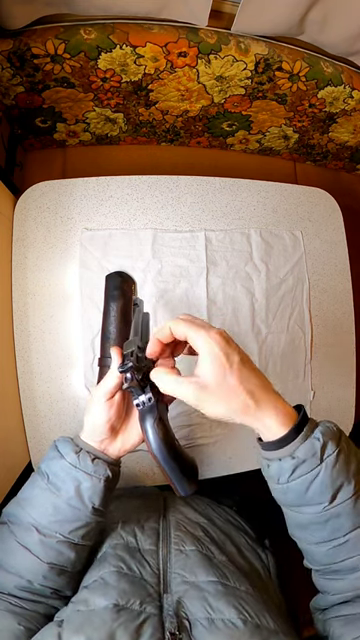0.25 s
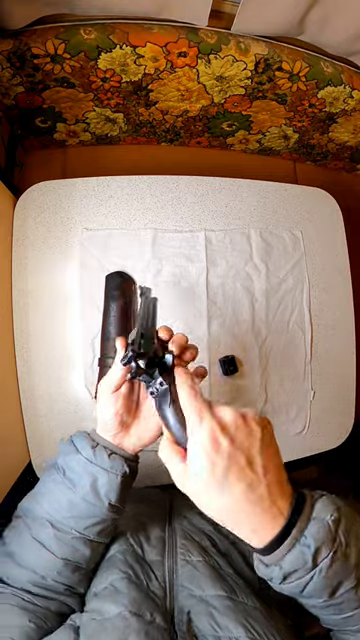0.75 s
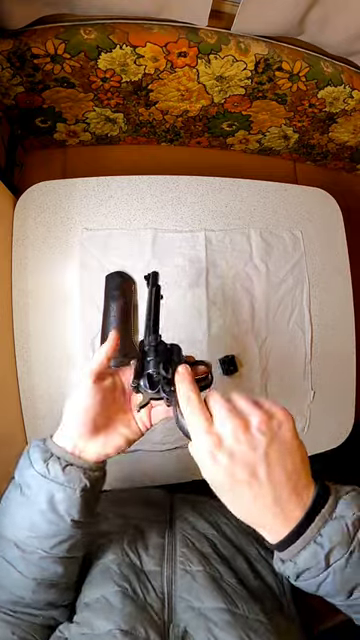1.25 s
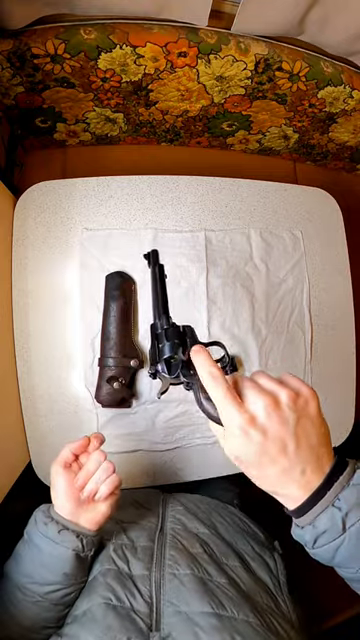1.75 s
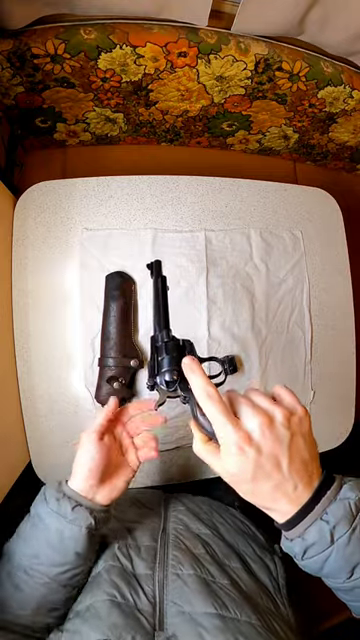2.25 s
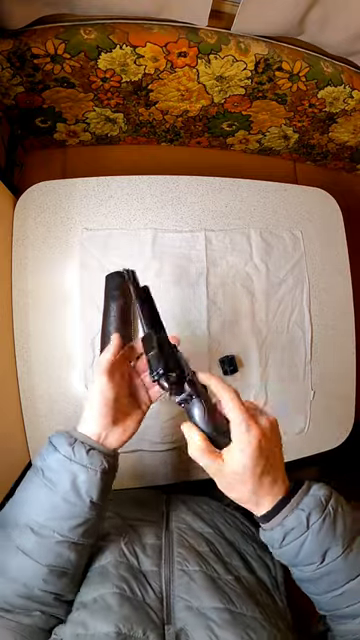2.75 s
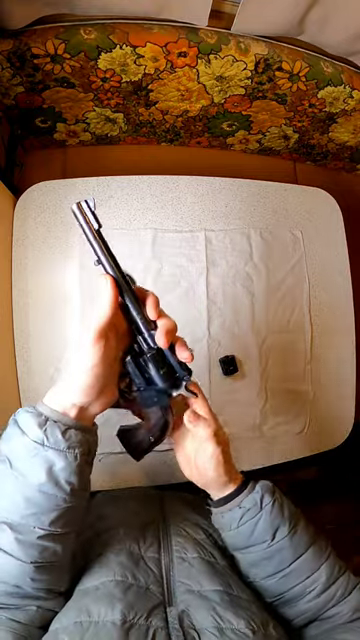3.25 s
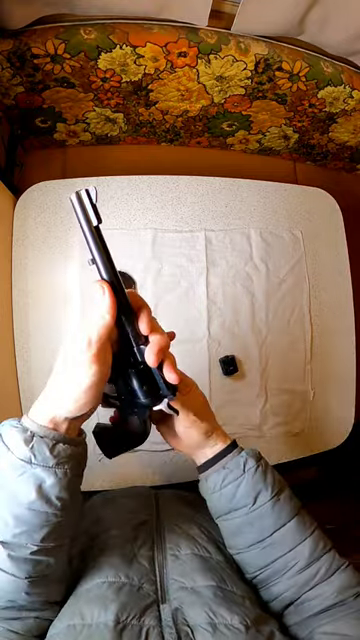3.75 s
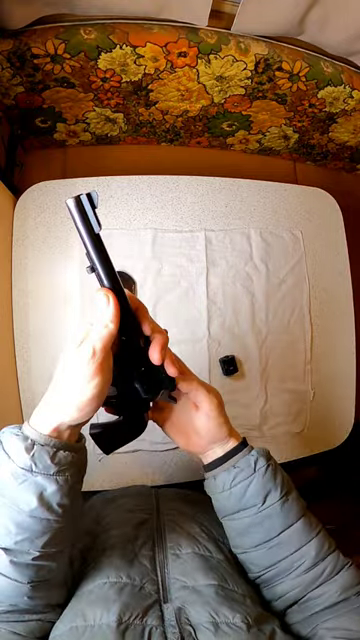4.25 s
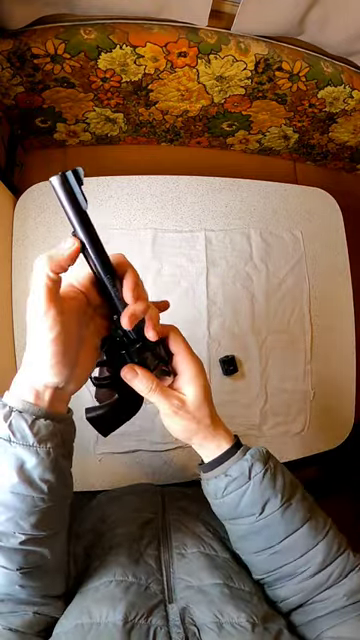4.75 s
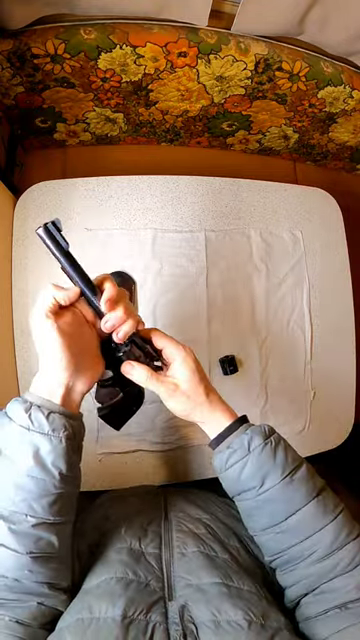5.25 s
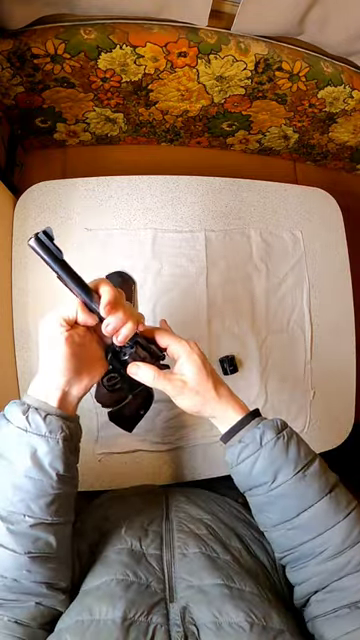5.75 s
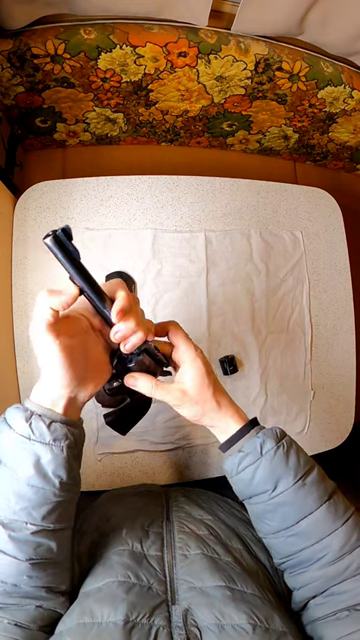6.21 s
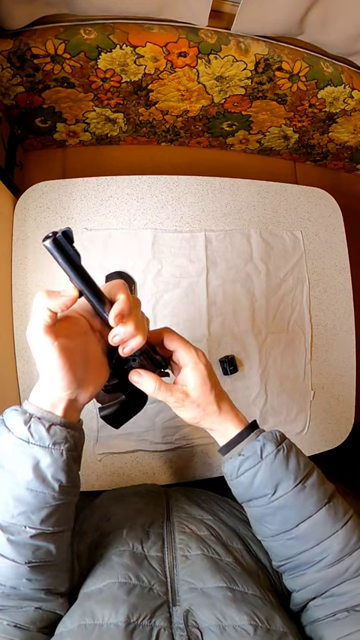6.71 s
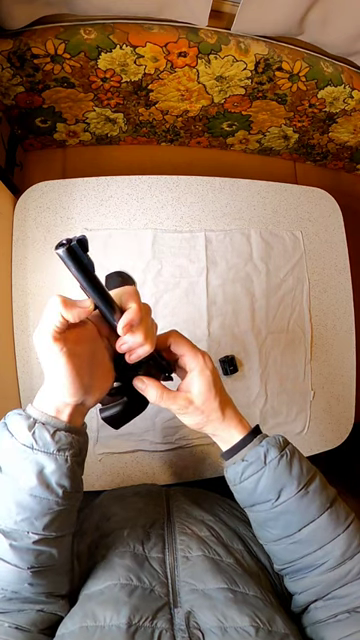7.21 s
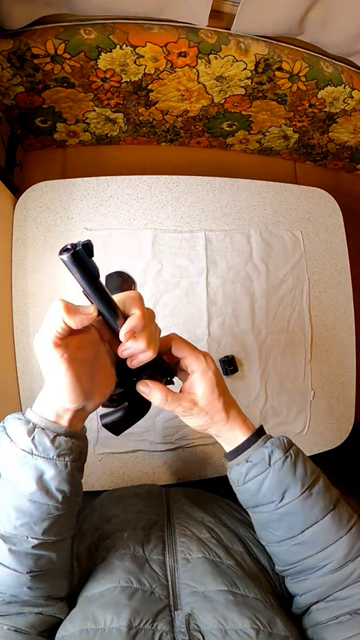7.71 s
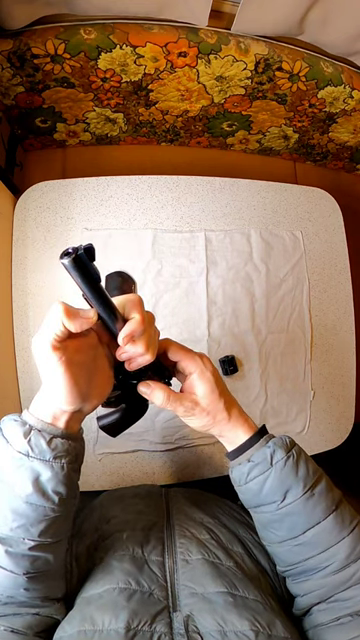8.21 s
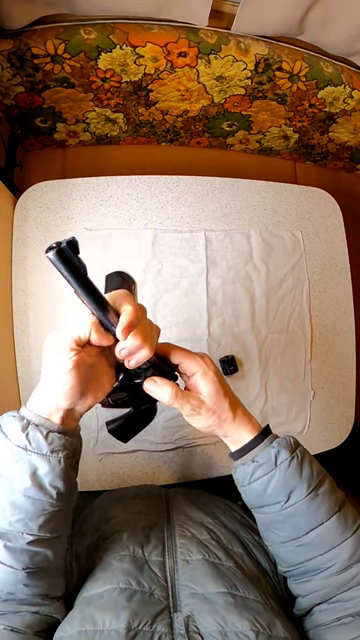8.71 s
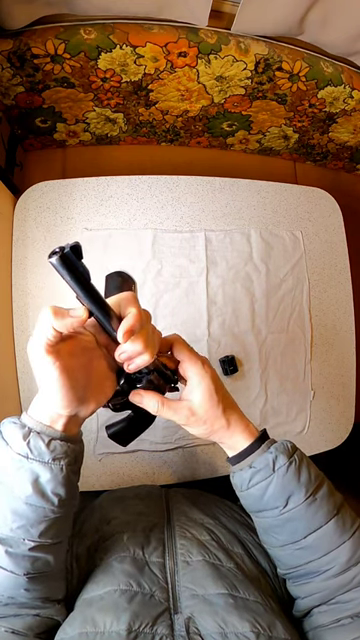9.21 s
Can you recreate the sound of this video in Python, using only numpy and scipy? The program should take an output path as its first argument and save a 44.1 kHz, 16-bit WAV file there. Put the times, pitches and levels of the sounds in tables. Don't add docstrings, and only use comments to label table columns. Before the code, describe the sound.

A close, dry stereo perspective in a small furnished room, with soft air, a faint appliance hum and muffled traffic. Nylon sleeves swish during the first second. From 1.36 to 1.68 s a revolver cylinder spins: about eighteen bright ratchet clicks speed up, then slow, with loose knocks between. A loud hard gate snap lands at 2.05 s and a softer shutting click at 2.5. Sleeves rub most from 2 to 5 s, with a tiny squeak near 2.3, while a low engine passes outside, strongest around 3 to 4.5. A thin rod clicks at 4.1 and faintly at 5.0. Bright brass knocks strike at 5.76, a cylinder stop clicks at 6.65, and a small pawl at 6.9. An engine idles faintly from 7.5 to 8.7. Action clicks come at 8.4 to 8.5, a cartridge bounces quickly at 8.85, dull table thumps follow until 9.06, and a latch closes at 9.46.

```python
import sys
import numpy as np
from scipy import signal
from scipy.fft import rfft, irfft, next_fast_len
from scipy.io import wavfile
from scipy.ndimage import uniform_filter1d, map_coordinates

SR = 44100
rng = np.random.default_rng(int(sys.argv[2]) if len(sys.argv) > 2 else 0)


def makeup_ratio(level_db):
    decades = np.asarray(level_db, float) / 20
    return 10 ** decades


def generate_wav(sig):
    pcm = np.round(np.clip(np.atleast_2d(sig).T, -1, 1) * 32767).astype(np.int16)
    wavfile.write(sys.argv[1], SR, pcm)


N = 417627
SPAN = 8192

# centre_hz, width_hz, level_db
CYLINDER_MODES = [(800, 200, -13.5), (2250, 500, -7), (3430, 60, -8), (3800, 300, -4), (4120, 250, -6),
                  (4900, 350, -7), (6360, 190, 0), (7250, 200, -9), (7800, 300, -7), (9150, 400, -1),
                  (11200, 900, -6), (15000, 2000, -7)]
# centre_hz, width_hz, level_db
FIRST_TOOTH_MODES = [(2070, 250, -11), (3780, 230, -3), (4200, 200, -8), (5290, 220, -9), (6300, 200, 1),
                     (6890, 130, -4), (7950, 150, -5), (8820, 200, 4), (11000, 600, -5)]
# centre_hz, width_hz, level_db
LAST_TOOTH_MODES = [(2400, 250, -12), (3430, 80, -17), (3870, 150, -5), (4150, 150, -4), (4800, 150, -10),
                    (5640, 130, -5), (6320, 130, 0), (7540, 150, -10), (9060, 200, -2), (9850, 200, -8),
                    (11400, 900, -8)]
# centre_hz, width_hz, level_db
FRAME_MODES = [(720, 130, -3), (1550, 250, 5), (2510, 130, -3), (2965, 150, 6.5), (3650, 250, -0.5),
               (4480, 220, 4.5), (6400, 300, 1), (7126, 200, -1.5), (8740, 500, -1)]
# centre_hz, width_hz, level_db
SIDE_ON_MODES = [(970, 100, 0), (1680, 300, 6), (2370, 250, 2), (3210, 300, 3), (4960, 250, 2),
                 (5820, 400, 2), (6890, 360, 2)]


def unit(x):
    return x / np.sqrt(np.mean(x ** 2) + 1e-20)


def short_peak(x):
    return np.sqrt(uniform_filter1d(x ** 2, size=130).max())


def along(points, hz):
    f, v = np.transpose(points)
    return np.interp(np.log(hz + 1), np.log(f + 1), v)


def curves(rows):
    s, *cols = np.transpose(rows)
    return [np.interp(np.arange(N) / SR, s, c, left=-120, right=-120) for c in cols]


def wobble(rate):
    knots = rng.standard_normal(int(N * rate / SR) + 4)
    return map_coordinates(knots, [np.arange(N) * rate / SR])


def filtered(x, response):
    m = next_fast_len(N + SPAN)
    return irfft(rfft(x, m) * response(np.fft.rfftfreq(m, 1 / SR)), m)[..., :N]


def echo():
    # pitch_hz, likeness
    walls = [(300, 1), (2500, .85), (9000, 0.68)]
    # pitch_hz, t60_s
    decay = [(200, 0.33), (1300, 0.15), (3500, 0.099), (8000, 0.075), (12000, .08)]
    hz, t, z = signal.stft(rng.standard_normal((2, SPAN)), SR, nperseg=256)
    turn = np.arccos(np.clip(along(walls, hz), -1, 1))[:, None] / 2
    fade = makeup_ratio(-60 * t / along(decay, hz)[:, None])
    mid, side = z * fade * [np.cos(turn), np.sin(turn)]
    tail = signal.istft(np.array([mid + side, mid - side]), SR, nperseg=256)[1]
    delayed = np.pad(tail, ((0, 0), (200, 0)))[:, :SPAN]
    return delayed / np.linalg.norm(tail[0])


def add(out, s, sound, pan_db, room_db):
    wet = signal.fftconvolve(sound[None], echo(), axes=1)[:, :SPAN]
    lead = .35 * rng.standard_normal() * np.gradient(sound) * [[1], [-1]]
    both = (sound + lead) * makeup_ratio([[pan_db / 2], [-pan_db / 2]]) + makeup_ratio(room_db) * wet
    out[:, round(s * SR):][:, :SPAN] += both


def click(db, middle_db, hard_db, bright_db, dull_db, t60, modes, ring_db, scatter_db, chatter, blow, detune=0):
    t, f = np.arange(SPAN) / SR - .0009, np.fft.rfftfreq(SPAN, 1 / SR)
    grind = .5 * np.exp(-np.abs(t / chatter) ** 4)
    rattle = 0.43 * makeup_ratio(-60 * t / np.clip(t60, .002, .1))
    force = (t > 0) * (grind + rattle) * rng.standard_normal(SPAN)
    blow_and_rebound = np.searchsorted(t, [0, chatter * rng.uniform(.6, .9)])
    force[blow_and_rebound] += blow * np.array([-7.5, 3.5])
    force = rfft(force)
    evenness = np.sqrt(uniform_filter1d(np.abs(force) ** 2, size=44))
    ring = 0
    for centre, width, mode_db in modes:
        level_db = ring_db + mode_db + rng.normal(0, scatter_db)
        centre = centre * (1 + detune * rng.standard_normal())
        ring = ring + makeup_ratio(2 * level_db) / (1 + (2 * (f - centre) / width) ** 2)
    colour = makeup_ratio(along([(250, dull_db - 18.5), (1200, dull_db), (2400, -0.54), (3900, middle_db - 2.5),
                        (6400, hard_db - 2), (10000, bright_db - 1.0), (15000, bright_db - 12.5)], f))
    cepstrum = irfft(np.log(colour * np.sqrt(1 + ring) / evenness))
    cepstrum[1:SPAN // 2] *= 2
    cepstrum[SPAN // 2 + 1:] = 0
    sound = irfft(force * np.exp(rfft(cepstrum)))
    band = irfft(rfft(sound) * (f > 1800) * (f < 3100))
    return makeup_ratio(db - 7.0) * sound / short_peak(band)


def ratchet(out):
    # start_s, peak_db, middle_db, hard_db, bright_db
    teeth = [(1.3612, -13.5, 3.5, -1, -6), (1.3857, -11.5, 2, -1.5, -9.5), (1.4005, -11.5, 3, -3, -7.5),
             (1.4117, -9.5, 2.5, -5.5, -8), (1.4222, -11.5, 0.5, -2, -7), (1.4327, -10.5, -1, -2, -8.5),
             (1.4441, -12, 1.5, -1.5, -9), (1.4561, -11.5, 0.5, -1, -10), (1.4681, -12, 2, 0, -9.5),
             (1.4812, -12.5, 3.5, -3.5, -9.5), (1.4954, -12.5, 2.5, -1, -9.5), (1.51, -12.5, 1, -2, -8.5),
             (1.5259, -12.5, 1, -1.5, -8.5), (1.5439, -12, 0.5, -1.5, -9), (1.5638, -13, 1, -1.5, -7.5),
             (1.5883, -11.5, 2, -3, -7.5), (1.6207, -11, 3, 0, -6), (1.6736, -11.5, 6, 3.5, -6)]
    parts = [FIRST_TOOTH_MODES] + [CYLINDER_MODES] * (len(teeth) - 3) + [LAST_TOOTH_MODES] * 2
    for (s, db, *colour), part in zip(teeth, parts):
        detune = .012 * (part is CYLINDER_MODES)
        tooth = click(db, *colour, dull_db=-2, t60=.035, modes=part, ring_db=16, scatter_db=2.5,
                      chatter=.0028, blow=.45, detune=detune)
        add(out, s, makeup_ratio(db - 9.7) * tooth / short_peak(tooth), pan_db=-0.2, room_db=-11.0)


def loose_cylinder(out):
    # start_s, peak_db
    knocks = [(1.3635, -14.5), (1.372, -27.5), (1.407, -17.5), (1.477, -18.5), (1.4825, -12), (1.4875, -16),
              (1.553, -24), (1.571, -21), (1.5795, -22.5), (1.598, -26.5), (1.6233, -17.5), (1.676, -17)]
    parts = [FIRST_TOOTH_MODES] * 2 + [CYLINDER_MODES] * (len(knocks) - 4) + [LAST_TOOTH_MODES] * 2
    for (s, db), part in zip(knocks, parts):
        knock = click(db, middle_db=3, hard_db=-3, bright_db=-7, dull_db=-4, t60=.03, modes=part,
                      ring_db=14, scatter_db=2.5, chatter=.0029, blow=.28)
        add(out, s, makeup_ratio(db) * knock / np.abs(knock).max(), pan_db=0.5, room_db=-10.0)


def loading_gate(out):
    # start_s, peak_db, middle_db, hard_db, bright_db, dull_db
    snap = (2.0463, -8.5, -4, -1, -11.5, -8)
    # centre_hz, width_hz, level_db
    open_modes = [(2480, 500, 1), (3770, 200, -2), (4370, 150, 2), (4980, 310, 3), (5400, 200, 1),
                  (6300, 250, 6), (6870, 250, 3), (8130, 250, 0), (8900, 300, 2), (10900, 600, 3)]
    # start_s, peak_db, middle_db, hard_db, bright_db
    shutting = [
        (2.5237, -20, -8, -4, -10),
        (2.526, -24, -3.5, -1, -9),
    ]
    # centre_hz, width_hz, level_db
    shut_modes = [(745, 118, 8.5), (2100, 300, 6), (2880, 200, 3), (4550, 150, 1), (5510, 200, 4),
                  (6590, 200, 1), (6950, 200, 3), (8200, 300, 4), (8800, 180, 2), (10500, 500, -1)]
    sound = click(*snap[1:], t60=.013, modes=open_modes, ring_db=5, scatter_db=.6, chatter=.0023, blow=1)
    add(out, snap[0], sound, pan_db=0.6, room_db=-16.5)
    for s, *levels in shutting:
        sound = click(*levels, dull_db=-11.5, t60=.035, modes=shut_modes, ring_db=5, scatter_db=.6,
                      chatter=.0022, blow=.7)
        add(out, s, sound, pan_db=0.0, room_db=-12.5)


def ejector_rod(out):
    # start_s, peak_db, middle_db, hard_db, bright_db
    contacts = [
        (4.1049, -25, -5, 7, -6.5),
        (4.107, -35, -5, -5, -12),
        (5.0377, -36, -3, -12, -16),
    ]
    # centre_hz, width_hz, level_db
    modes = [(2510, 290, -6), (3893, 200, 0), (6600, 200, -13), (7080, 150, 3.5), (7400, 150, 4),
             (7930, 150, 3), (8860, 300, 4)]
    for s, *levels in contacts:
        sound = click(*levels, dull_db=-8, t60=.02, modes=modes, ring_db=7, scatter_db=.5,
                      chatter=.0015, blow=.68)
        add(out, s, sound, pan_db=-1.0, room_db=-10)


def cylinder_stop(out):
    # start_s, peak_db, middle_db, hard_db, bright_db
    contacts = [
        (6.6436, -25, 0, 3, -4),
        (6.647, -22, -1, -1, -8),
        (6.6576, -28.5, 0, -14, -30),
    ]
    # centre_hz, width_hz, level_db
    modes = [(1500, 200, -1), (2500, 170, 0), (3190, 260, 4), (3970, 180, 0), (4900, 250, -3),
             (5680, 150, 0), (6670, 220, 3), (7170, 150, 3), (9090, 150, 5), (11200, 400, 5)]
    for s, *levels in contacts:
        sound = click(*levels, dull_db=-11, t60=.04, modes=modes, ring_db=6, scatter_db=.9,
                      chatter=.0028, blow=.45)
        add(out, s, sound, pan_db=1.2, room_db=-13)


def action(out):
    # start_s, peak_db, middle_db, hard_db, bright_db
    contacts = [
        (8.4202, -34, -3, -7, -28),
        (8.4206, -34, -3, -9.5, -33),
        (8.4262, -30.5, -8, -3.5, -14),
        (8.4888, -19, -5, -2, -14.5),
        (8.4966, -27, -1, -14, -30),
        (8.5012, -24, 7, 2, -12),
        (8.509, -39, 3, 0, -17),
    ]
    # start_s, peak_db, middle_db, hard_db
    faint = [(2.027, -52, -4, -3), (2.0355, -42.5, -7, -5), (2.0385, -44.5, -6, -4), (5.747, -54, -1, -14),
             (5.752, -45, 0, -8), (2.043, -39, -3.5, 3), (4.087, -53, -3, 1), (5.6729, -61, 3.5, 8),
             (6.624, -46.5, -3.5, -21.5), (6.934, -52, 0, -14.5), (8.478, -56, 0, -8),
             (8.7311, -53.5, -1.5, -8)]
    for s, *levels in contacts:
        sound = click(*levels, dull_db=-5, t60=.037, modes=FRAME_MODES, ring_db=5, scatter_db=1.2,
                      chatter=.002186, blow=.5)
        add(out, s, sound, pan_db=2.0, room_db=-13)
    for s, db, middle_db, hard_db in faint:
        tick = click(db + 1.5, middle_db, hard_db, bright_db=hard_db - 20.5, dull_db=-14, t60=.01,
                     modes=FRAME_MODES, ring_db=.5, scatter_db=3, chatter=.0018, blow=.35)
        add(out, s, tick, pan_db=.4, room_db=-14.5)


def table_thump(scatter_db):
    # pitch_hz, level_db, t60_s
    modes = [(174.6, -1.5, 0.38), (225.6, 1.5, 0.15), (257.7, -2.5, 0.13), (390.4, -4, 0.13),
             (433.7, -4.5, 0.095), (652, -7, 0.15), (730, -10.5, 0.07), (981, -1.5, 0.095),
             (1130, -18, 0.31)]
    t, wood = np.arange(SPAN) / SR, 0
    for hz, db, t60 in modes:
        level = makeup_ratio(db + rng.normal(0, scatter_db) - 60 * t / t60)
        wood = wood + level * np.sin(2 * np.pi * hz * t)
    return wood * (1 - np.exp(-t / 0.0037))


def drops(out):
    # start_s, peak_db, hard_db, dull_db, thump_db
    falls = [
        ((-.5, -17), [(5.7573, -7.5, -10, -17.5, -20), (5.762, -6, -5.5, -18, -24.5), (5.7706, -19, -6.5, -7.5, -24), (8.8803, -24, -13, -9, -18.5)]),
        ((-4, -41), [(8.9295, -25, -24, -4, -22), (8.938, -29.5, -26, 2, -25), (9.0498, -15.5, -19, -7, -19.5), (9.058, -24.5, -17, -2, -11)]),
    ]
    # centre_hz, width_hz, level_db
    brass_modes = [(1183, 202, 1.5), (1900, 230, 7), (2450, 330, -11), (3230, 310, 6.5), (4240, 152, -10.5),
                   (6280, 400, 5.5), (7300, 850, -1)]
    for ((middle_db, bright_db), bounces), part in zip(falls, [brass_modes, SIDE_ON_MODES]):
        for s, db, hard_db, dull_db, thump_db in bounces:
            thump = makeup_ratio(db + thump_db - 4.0) * table_thump(scatter_db=0.93)
            brass = click(db - 6.5, middle_db, hard_db + 3.5, bright_db + 2.5, dull_db + 6.0, t60=.033,
                          modes=part, ring_db=4, scatter_db=1.2, chatter=.002, blow=.7)
            add(out, s, brass + thump, pan_db=0.0, room_db=-8.0)


def cartridge(out):
    # start_s, peak_db
    landings = [
        (8.8503, -8),
        (8.86058, -12),
        (8.87085, -12.5),
    ]
    # centre_hz, width_hz, level_db
    case_modes = [(980, 150, 0), (1880, 350, 3), (2920, 150, -2), (3400, 280, 9), (4960, 400, -5),
                  (6260, 400, 8), (7300, 500, 1), (8500, 700, 5)]
    rock_delay_s, rock_db = .0045, -4
    edge = click(-6.5, middle_db=-2, hard_db=-4, bright_db=-26, dull_db=-9, t60=.03, modes=case_modes,
                 ring_db=5, scatter_db=.5, chatter=.0022, blow=.5)
    rock = click(rock_db - 6.5, middle_db=-12, hard_db=-18, bright_db=-40, dull_db=-4, t60=.02,
                 modes=SIDE_ON_MODES, ring_db=4, scatter_db=.5, chatter=.0015, blow=.6)
    contact = edge + np.roll(rock, round(rock_delay_s * SR)) + makeup_ratio(-22) * table_thump(scatter_db=0)
    start, bounces = landings[0][0], 0
    for s, db in landings:
        later = np.pad(contact, (round((s - start) * SR), 0))[:SPAN]
        bounces = bounces + makeup_ratio(db) * later
    add(out, start, bounces, pan_db=0.0, room_db=-9.0)


def small_parts(out):
    # start_s, peak_db, middle_db, hard_db, bright_db
    pawl = (6.9067, -36, 0, 3, -5)
    # centre_hz, width_hz, level_db
    pawl_modes = [(2130, 390, -4), (3060, 260, 0), (3970, 190, -2), (5230, 420, 4), (7140, 360, 4),
                  (8520, 690, -6), (10800, 360, 6), (13200, 370, 4)]
    # start_s, peak_db, middle_db, hard_db, bright_db
    latch = [
        (9.4395, -62, 0, -3, -3),
        (9.45, -55, 0, -3, -3),
        (9.4605, -24, -1, -3, -5),
    ]
    # centre_hz, width_hz, level_db
    latch_modes = [(2420, 250, -3), (3290, 270, 6), (4810, 350, 0), (5660, 260, 0), (6340, 480, -2),
                   (8050, 320, -1), (8990, 230, 1), (11400, 270, 6), (12600, 260, 4)]
    # start_s, peak_db, pitch_hz
    ticks = [(2.002, -48, 2900), (5.0135, -45, 4900), (5.015, -44, 3050), (5.0505, -45, 2900),
             (5.0525, -50, 8800), (5.2668, -43, 3500), (5.3374, -53, 3300), (5.379, -55, 7400),
             (5.5458, -44, 2900), (6.3722, -42, 3500), (6.9315, -43, 1800), (7.520, -58, 7200),
             (7.535, -56, 3100), (8.840, -41, 3400)]
    sound = click(*pawl[1:], dull_db=-13, t60=.03, modes=pawl_modes, ring_db=12, scatter_db=.5,
                  chatter=.0018, blow=.9)
    add(out, pawl[0], sound, pan_db=1.0, room_db=-12)
    for s, *levels in latch:
        sound = click(*levels, dull_db=-12, t60=.04, modes=latch_modes, ring_db=6, scatter_db=.5,
                      chatter=.0042, blow=.3)
        add(out, s, sound, pan_db=.6, room_db=-13)
    for s, db, hz in ticks:
        tick = click(db, middle_db=-1.5, hard_db=-8, bright_db=-24, dull_db=-12, t60=.008,
                     modes=[(hz, .2 * hz, 0)], ring_db=19, scatter_db=0, chatter=.0014, blow=.6)
        add(out, s, makeup_ratio(db + 3.5) * tick / np.abs(tick).max(), pan_db=.3, room_db=-15)


def jolts(out):
    # start_s, level_db, rise_s
    shoves = [
        (1.413, -25.5, .0016),
        (2.047, -15.5, 0.0017),
    ]
    t = np.arange(SPAN) / SR
    for s, db, rise in shoves:
        pulse = np.e * t / rise * np.exp(-t / rise) * (1 - t / (2 * rise))
        add(out, s, -makeup_ratio(db) * pulse, pan_db=2.0, room_db=-30.5)


def handling():
    out = np.zeros((2, N + SPAN))
    for source in (ratchet, loose_cylinder, loading_gate, ejector_rod, cylinder_stop, action, drops,
                   cartridge, small_parts, jolts):
        source(out)
    return out[:, :N]


def rush(spectrum, alike, patchy_db, grain_db=0):
    grainy = rng.standard_normal((2, N)) * makeup_ratio(grain_db * wobble(300))
    z = signal.stft(grainy, nperseg=512)[2]
    field = uniform_filter1d(rng.standard_normal(z.shape[1:]), size=6, axis=0)
    field = uniform_filter1d(field, size=10, axis=1)
    pair = signal.istft(z * makeup_ratio(patchy_db * unit(field)), nperseg=512)[1][:, :N]

    def mid_side(hz):
        turn = np.arccos(np.clip(along(alike, hz), -1, 1)) / 2
        return makeup_ratio(along(spectrum, hz)) * [np.cos(turn), np.sin(turn)]

    mid, side = filtered(pair, mid_side)
    return unit(np.array([mid + side, mid - side]))


def swells(rows, rest_db):
    peak_at, rounded = 0.47, 0.97
    s, length, *levels = np.transpose(rows)
    u = np.clip((np.arange(0, N + 64, 64) / SR - s[:, None]) / length[:, None], 0, 1)
    shape = np.abs(np.sin(np.pi * u ** (np.log(.5) / np.log(peak_at)))) ** (2 * rounded)
    power = makeup_ratio(2 * np.array(levels)) @ shape + makeup_ratio(2 * np.array(rest_db))[:, None]
    return [np.interp(np.arange(N) / 64, np.arange(len(p)), np.sqrt(p)) for p in power]


def sleeves():
    # start_s, length_s, swish_db, rub_db
    movements = [(-.1, 0.14, -60, -70), (-.6, 6.4, -73.5, -83.5), (.24, 0.56, -64, -64),
                 (.56, 0.4, -62, -59.5), (.86, 0.4, -62.5, -60), (1.03, 0.097, -65, -75),
                 (1.72, 0.17, -75, -80), (2.12, 0.44, -58.5, -62.5), (2.68, 0.77, -58, -59.5),
                 (3.1, 0.69, -58.5, -54.5), (3.68, 0.28, -67.5, -59.5), (3.95, 0.39, -66, -63),
                 (4.28, .4, -65, -62.5), (4.5, 0.37, -60, -57), (3.8, 3.05, -73, -75.5),
                 (4.82, 0.51, -63.5, -61.5), (5.25, 0.38, -68.5, -67), (5.58, 0.36, -63, -71),
                 (5.96, 0.16, -63, -78), (6.38, .35, -74, -77.5), (8.5, 0.31, -68, -72),
                 (8.7, 0.14, -62.5, -71), (8.88, 0.19, -59.5, -72)]
    # pitch_hz, density_db
    swish_spectrum = [(1060, -31.5), (1800, -4.5), (2230, -6), (2710, -4), (4040, -8), (6460, -6.5),
                      (12800, -28), (13600, -34.5), (15000, -54)]
    # pitch_hz, density_db
    rub_spectrum = [(260, -35), (450, -3), (631, -5), (667, 1), (724, -5.5), (1280, -0.5), (2130, -6),
                    (4000, -22.5), (5200, -52.5), (8800, -120)]
    swishing, rubbing = swells(movements, rest_db=(-88, -77.5))
    flutter = 1.2 * wobble(30)
    swish = rush(swish_spectrum, [(2000, .9), (8000, .6)], patchy_db=1.8, grain_db=1.5)
    rub = rush(rub_spectrum, [(500, .95), (3000, .8)], patchy_db=1.2, grain_db=2)
    return makeup_ratio(flutter) * (swishing * swish + rubbing * rub)


def squeaks():
    # start_s, length_s, from_hz, to_hz, level_db
    whistles = [
        (1.069, .1, 4300, 6600, -71),
        (2.275, .065, 2900, 3550, -61),
        (5.985, .05, 3600, 4200, -71),
    ]
    out, rough = np.zeros(N), wobble(260)
    for s, length, from_hz, to_hz, db in whistles:
        u = np.linspace(0, 1, round(length * SR))
        phase = 2 * np.pi * np.cumsum(from_hz + (to_hz - from_hz) * np.sqrt(u)) / SR
        out[round(s * SR):][:len(u)] = 2 * makeup_ratio(db) * np.sin(np.pi * u) * np.sin(phase)
    return out * (.5 + 0.96 * rough)


def engine(rows, orders_db, unsteady_db):
    # centre_hz, width_hz, level_db
    wall_modes = [(54, 8, 1), (82, 13, 2.5), (96.3, 4.9, 5), (106, 6, 1.5), (113.4, 5.1, 5), (160, 25, 1.5),
                  (174, 16, -1.5), (194, 12, -4)]
    hz, loud_db, tilt_db = curves(rows)
    hz, orders = np.abs(hz), 0
    phase = 2 * np.pi * np.cumsum(hz) / SR
    for k, db in orders_db:
        wall = makeup_ratio(2 * -16)
        for centre, width, mode_db in wall_modes:
            wall = wall + makeup_ratio(2 * mode_db) / (1 + (2 * (k * hz - centre) / width) ** 2) ** 2
        tilt = (k - 2) * np.clip(tilt_db, -9, 9)
        level = makeup_ratio(loud_db + db + tilt + unsteady_db * wobble(20))
        orders = orders + np.sqrt(2 * wall) * level * np.sin(k * phase + 0.39 * wobble(15))
    return orders + .12 * np.roll(orders, 90) * [[1], [-1]]


def outside():
    # start_s, firing_hz, loudness_db, tilt_db per order
    passing = [(1.05, 53.9, -66.5, 9), (1.33, 51, -56, 5), (1.75, 53.3, -60.5, 4.5),
               (1.95, 54, -53.5, -1.5), (2.3, 54.4, -51, -1.5), (2.55, 56.04, -43, -0.5),
               (2.8, 57.4, -56.5, 3.5), (3.09, 57.87, -42.5, -4), (3.45, 56.95, -45.5, 0),
               (3.86, 53.4, -41, 1), (4.29, 48.3, -41, 0), (4.45, 47.4, -50.5, 1), (5.0, 42.2, -48.5, 2),
               (5.55, 40.95, -53.5, -4.5), (5.75, 40.7, -66.5, -1.5), (6.1, 39.73, -48, -7),
               (6.3, 39, -66, -8.5), (6.9, 38.4, -65, -9)]
    # order, level_db
    passing_orders = [(1, -2), (1.5, -17), (2, 0), (2.5, -22), (3, -2), (3.5, -17), (4, -3)]
    # start_s, firing_hz, loudness_db, tilt_db per order
    idling = [
        (7.4, 40.55, -75, 0.00098),
        (7.6, 39.67, -53, 0),
        (8.0, 39.3, -55, 0.00085),
        (8.45, 40.03, -48, 0.0027),
        (8.62, 37.1, -52, 0),
        (8.78, 36.9, -68, 0),
    ]
    # order, level_db
    idling_orders = [(1, 11.5), (1.6, -2), (2, -5.5), (3, -21)]
    both = engine(passing, passing_orders, unsteady_db=1) + engine(idling, idling_orders, unsteady_db=2)
    return both * makeup_ratio([[-.3], [.3]])


def room_tone():
    # pitch_hz, density_db
    air_spectrum = [(15, -31.5), (25, -6), (57, -1), (112, -19), (181, -2.5), (243, -13.5), (326, -14),
                    (427, -29.5), (529, -19), (833, -26.5), (903, -20), (1000, -19), (1630, -17.5),
                    (2370, -26), (5000, -37.5), (6600, -33), (10000, -50), (15000, -53)]
    # pitch_hz, level_db
    lines = [(183.0, -70), (323.0, -62.5), (925.9, -76), (1297, -80.5), (1518, -78.5), (1669, -83.5),
             (2223, -88), (2708, -85.5)]
    # start_s, length_s, deep_db, boom_db
    low_swells = [(.4, 1, -80, -53.5), (1.3, 0.47, -67, -56.5), (1.8, 0.42, -60.5, -71.5),
                  (2.72, 0.58, -48.5, -61), (3.1, 0.57, -60, -54.5), (3.8, .8, -55, -55.5),
                  (4.35, .55, -51.5, -61), (4.95, 0.87, -54.5, -60), (5.6, .45, -63.5, -58),
                  (6.35, 0.52, -69, -63.5), (7.45, 1, -56, -59.5), (8.1, 0.51, -55.5, -66),
                  (8.72, 0.49, -56.5, -60)]
    # pitch_hz, likeness
    alike = [(60, 0.9), (180, 0.89), (550, 0.98), (1650, -0.06), (4970, -0.29), (15000, -0.74)]
    t, hum = np.arange(N) / SR, 0
    for hz, db in lines:
        level = np.sqrt(2) * makeup_ratio(db + wobble(4.0))
        hum = hum + level * np.sin(2 * np.pi * hz * t + 0.85 * wobble(5))
    deep, boom = swells(low_swells, rest_db=(-69.5, -65))
    deep_spectrum = [(5, -15.5), (20, 1.5), (45, -4.5), (110, -4.5), (200, -13.5), (260, -120)]
    boom_spectrum = [(150, -120), (200, -14.0), (280, 0.0), (350, -2.0), (420, -11.0), (520, -29.5),
                     (600, -120)]
    deep = deep * rush(deep_spectrum, alike, patchy_db=-1.5)
    boom = boom * rush(boom_spectrum, alike, patchy_db=3.0)
    return makeup_ratio(-58) * rush(air_spectrum, alike, patchy_db=1.0) + hum + deep + boom


def scene():
    return handling() + sleeves() + squeaks() + outside() + room_tone()


def low_pass(x):
    return signal.sosfilt(signal.butter(12, 16520, fs=SR, output="sos"), x)


def record(dry):
    # pitch_hz, level_db
    response = [(10000, 0), (13000, -0.5), (15700, -16.5), (16350, -25), (16700, -80)]
    rounded = dry / (1 + np.abs(dry / .95) ** 6) ** (1 / 6)
    mix = filtered(rounded, lambda hz: makeup_ratio(along(response, hz)))
    return low_pass(mix)


dry = scene()
out = record(dry)
generate_wav(out)
```